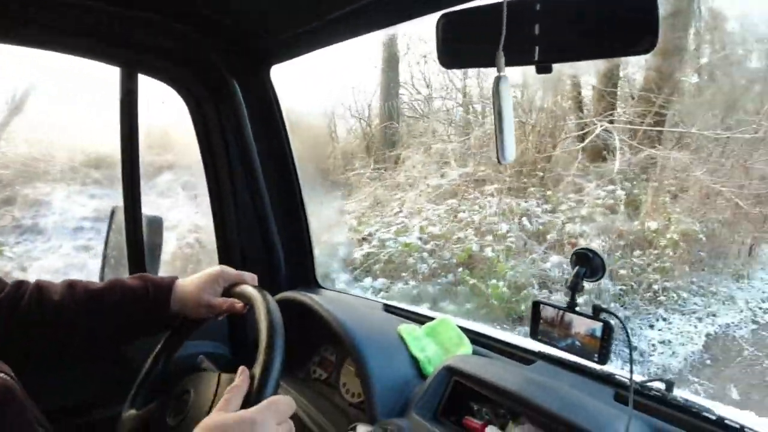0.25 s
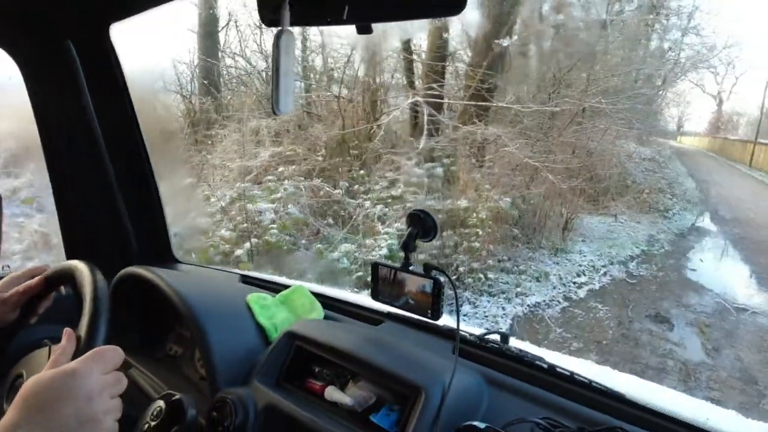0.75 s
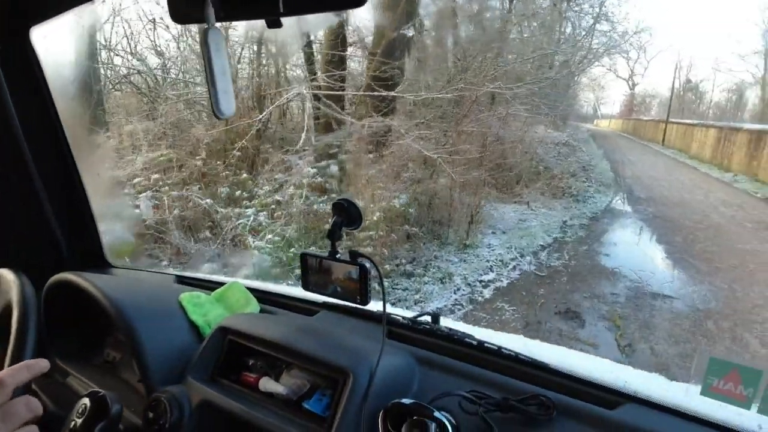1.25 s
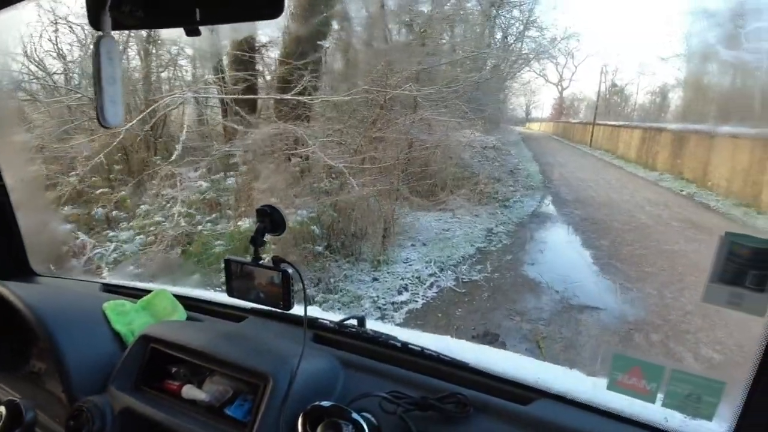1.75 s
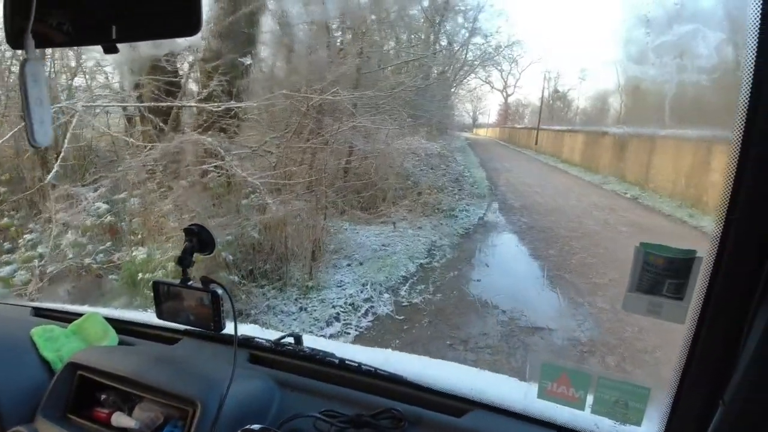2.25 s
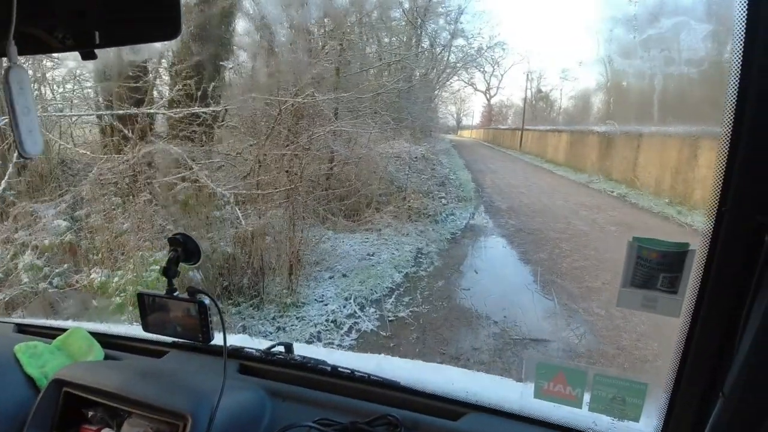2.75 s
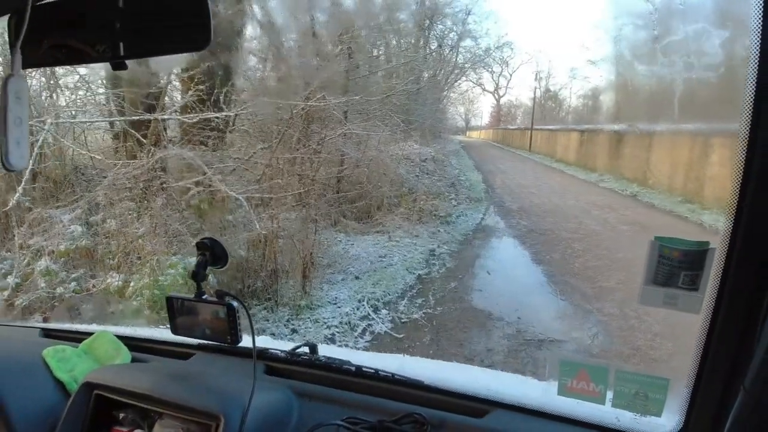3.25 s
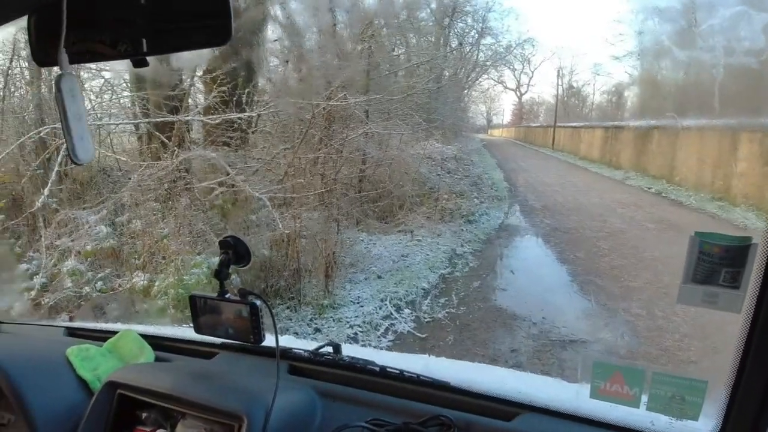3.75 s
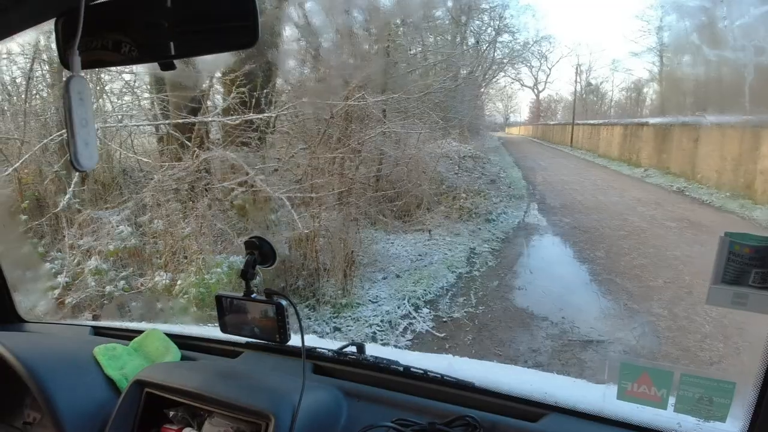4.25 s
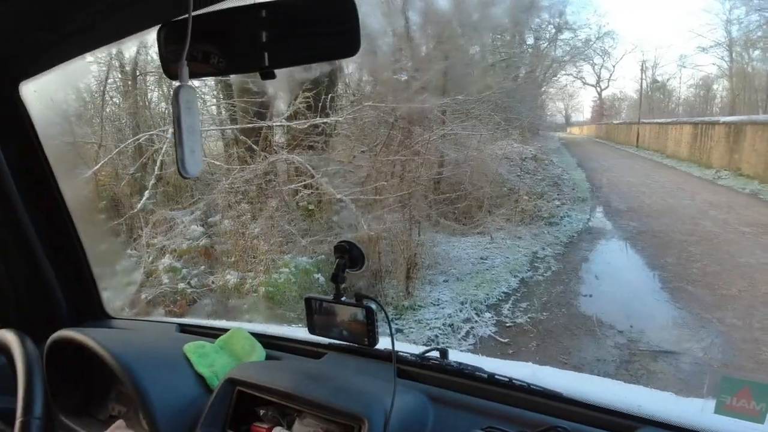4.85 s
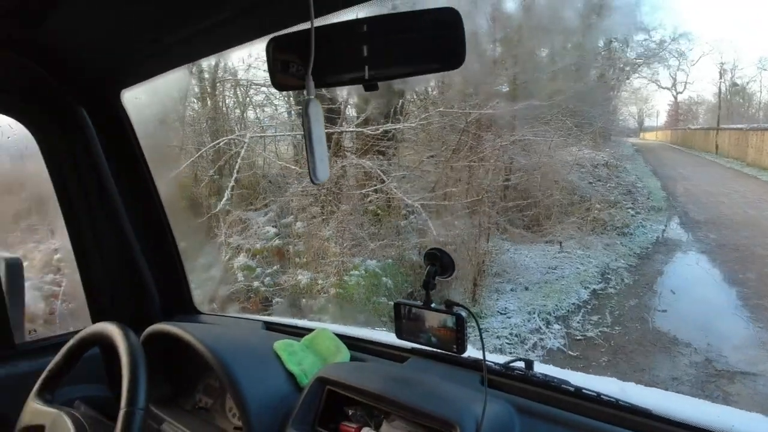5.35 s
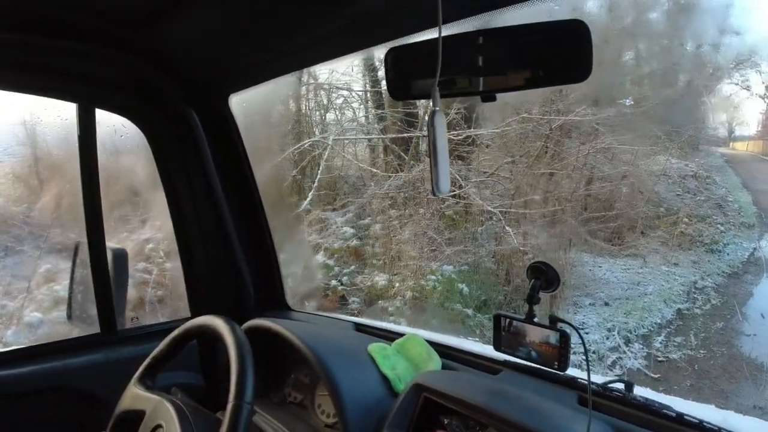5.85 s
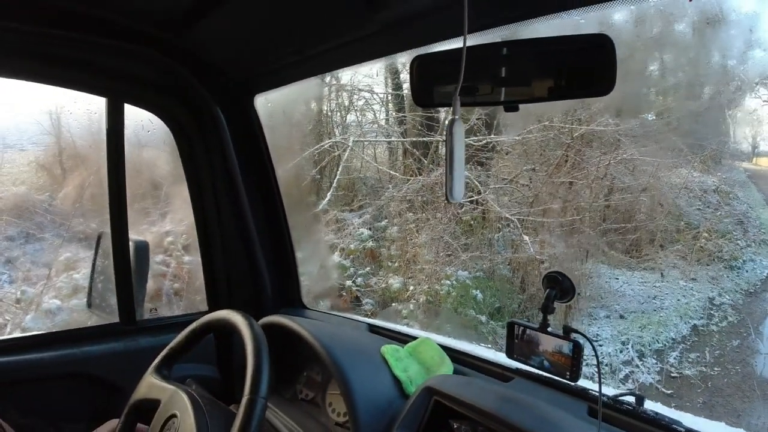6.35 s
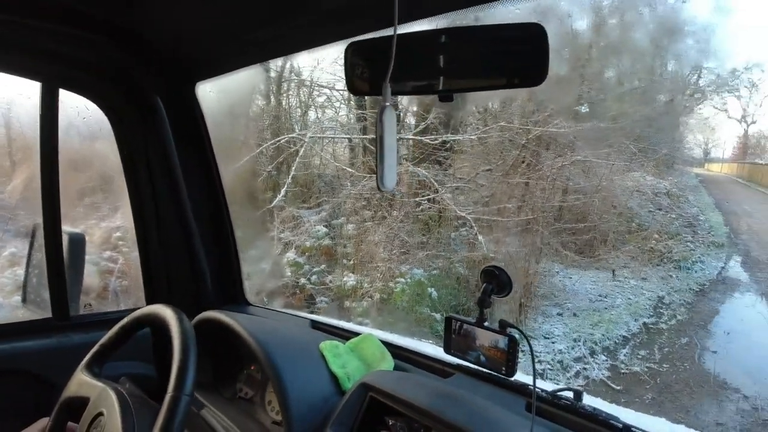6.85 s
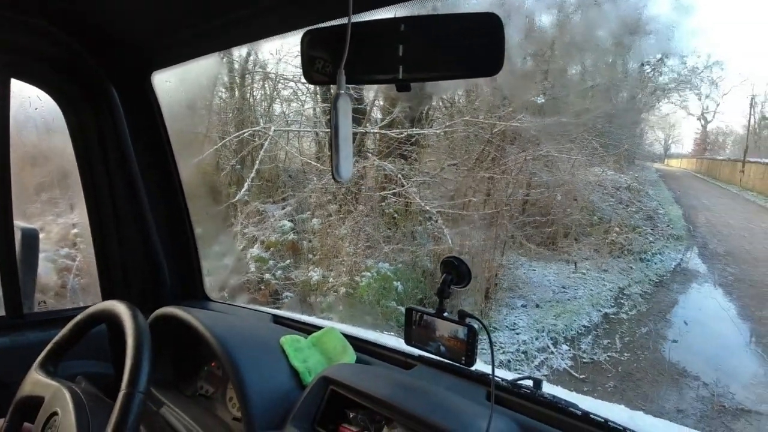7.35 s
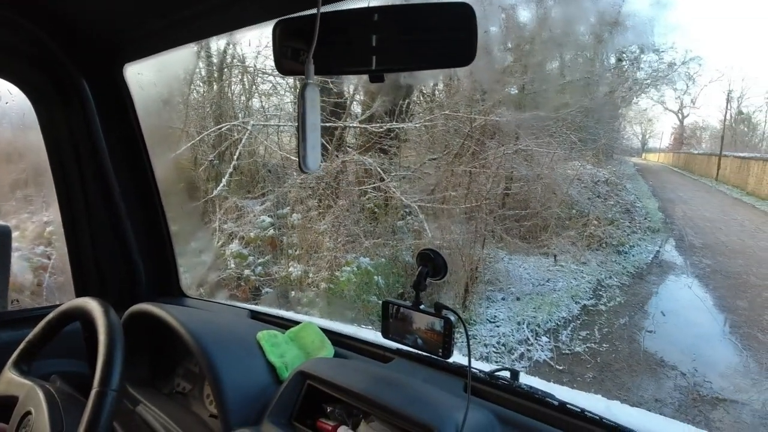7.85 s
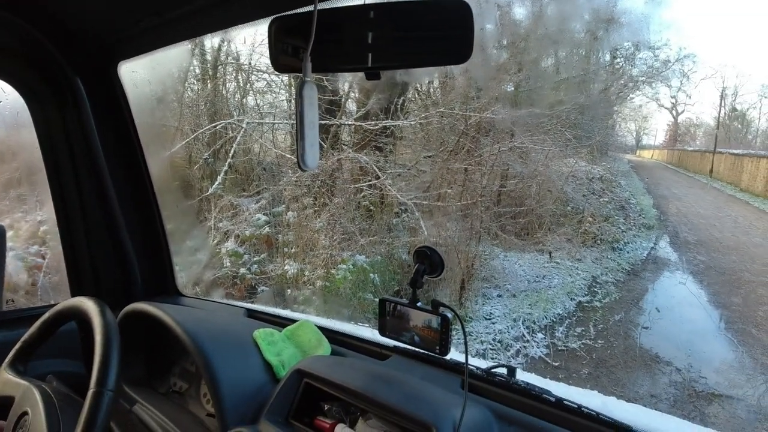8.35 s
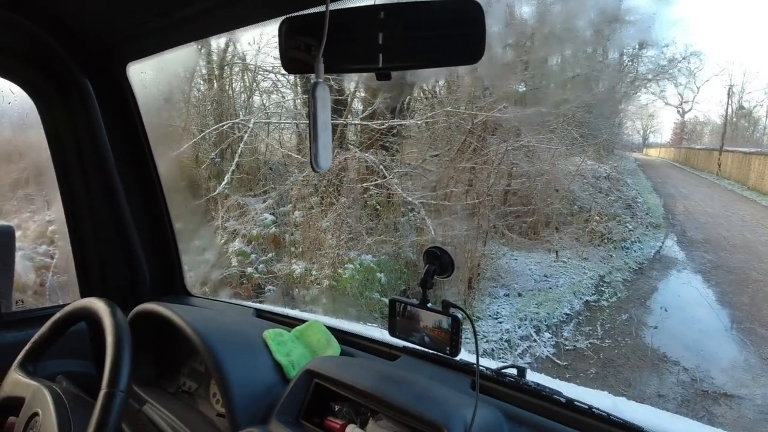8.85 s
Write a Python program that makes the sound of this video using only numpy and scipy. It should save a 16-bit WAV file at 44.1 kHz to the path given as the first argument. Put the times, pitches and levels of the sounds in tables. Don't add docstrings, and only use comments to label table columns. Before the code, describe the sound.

The sound is close and boxy, inside a small van cab, through a small microphone with muted treble. From 0 to 2 s a two-cylinder diesel rolls at about 28 uneven firings a second, a low drone with panel hum, faint whine and loose trim knocks. At 2.0 s a tinny double bang, another knock at 2.2 s, as revs fall to a slower, thumping idle by 2.5 s, with steady clatter and a wavering pump whine near 1.7 kHz. Soft cloth brushes around 3 to 4.4 s. Four loud handbrake ratchet clicks quicken from 3.95 to 4.22 s. Dull knocks at 5.05 and 5.1 s; a heavy steel lever clunk at 5.45 s booms the floor, followed by panel buzz. From 6.9 s the engine lurches and is cut; shuddering jolts, rattling trim and metallic odds continue until 8.3 s. It stops by 8.5 s; near-quiet, small ticks, then a seat slips at 9.04 s.

```python
import sys
import numpy as np
from scipy import signal
from scipy.fft import rfft, irfft
from scipy.io import wavfile
from scipy.ndimage import uniform_filter1d

SR = 44100
rng = np.random.default_rng(int(sys.argv[2]) if len(sys.argv) > 2 else 0)


def to_wav(s):
    ch = np.atleast_2d(s).T
    pcm = np.round(np.clip(ch, -1, 1) * 32767)
    wavfile.write(sys.argv[1], SR, pcm.astype(np.int16))


def decibels_to_gain(level_db):
    exponent = np.asarray(level_db, float) / 20
    return 10 ** exponent


N = 401310

# time in seconds, four-stroke cycles per second in Hz.
ENGINE_SPEED = [(0, 14.5), (.6, 14.2), (1.15, 14.15), (1.3, 13.55), (1.8, 13.5), (1.95, 13.3), (2.2, 9.4),
                (2.45, 8.26), (6.85, 8.26), (7.1, 9.1), (7.5, 8.65), (7.8, 8.4), (8.1, 7.2), (8.45, 5.5)]
ROLL_HZ, IDLE_HZ = 13.3, 8.4
FUEL_CUT_S, STALL_S = 7.05, 7.87
START_TURN = .71
ENGINE_END_S = ENGINE_SPEED[-1][0]

# frequency in Hz, level in dB.
MOUNTS = [(15, -30), (20, -18), (25, -3), (33, 0), (42, -14), (52, -14)]
# time in seconds, lift in dB, width in seconds.
MOUNT_SWELL = [
    (.82, 6, 0.12),
    (2.5, -5.5, 0.45),
    (7.05, -5, 0.12),
    (7.62, 4.5, 0.19),
]
THUMP_ROLL_DB, THUMP_IDLE_DB, STALL_DROP_DB = -60, -42, -11
# frequency in Hz, level in dB.
FLOOR_PAN = [(50, -14), (58, -7), (67, -6), (80, -15), (92, -9), (99, 1), (109, 2), (116, -9), (127, -4),
             (158, -1), (168, 0), (182, -10), (230, -9), (400, -30)]
DRONE_ROLL_DB, DRONE_IDLE_DB = -45.5, -49.5
# start in seconds, end in seconds, lift in dB.
BUZZ = [
    (2.346, 2.845, 23.5),
    (5.473, 7, 27.5),
    (7, 7.448, 16.5),
    (7.597, 8.26, 27.5),
]
BUZZ_REST_DB = -64.5

# frequency in Hz, level in dB per Hz.
CAB_COLOUR = [(35, -40), (60, -7), (189, -4), (224, -7.5), (395, -6.5), (683, -6), (1530, -19.5),
              (1670, -23), (1880, -24.5), (3600, -35.5), (4680, -62), (7920, -120)]
# frequency in Hz, width in Hz, lift in dB.
PANELS = [(114.6, 15, 5.5), (152.7, 56, 6.5), (226, 11, 7), (342, 76, 4), (585, 160, 2), (602, 28, -6),
          (813, 29, 5), (1372, 42, 3.5), (2570, 71, 0), (3326, 400, -17.5)]
# frequency in Hz, level in dB per Hz.
RUSTLE = [(3000, -10), (3500, 0), (4600, -4), (5400, -6), (6300, -2), (7500, -9), (10000, -10),
          (12500, -13), (15700, -13)]
# time in seconds, level in dB.
SHAKE = [(0, -38), (1.15, -36.5), (1.5, -36.5), (2.2, -36), (2.5, -35), (3.7, -35.5), (4.15, -32),
         (4.35, -33), (4.8, -34), (5.1, -32.5), (6.4, -31.5), (6.8, -32.5), (7.2, -38), (7.8, -38),
         (8.06, -36), (8.26, -43), (8.4, -50.5), (8.6, -62.5)]
# time in seconds, lift in dB.
SHUDDER = [(6.87, -6), (6.955, 6), (7.03, 4), (7.15, 2), (7.285, 3.5), (7.405, 7), (7.52, 5), (7.57, -3),
           (7.635, 6), (7.755, 6), (7.81, -3), (7.885, 6), (7.98, 4), (8.038, 7), (8.09, 5), (8.14, 7),
           (8.17, 4), (8.2, 4), (8.25, 6), (8.32, 5), (8.37, 1), (8.425, 3), (8.48, 2)]
SLOW_ROCK_S, QUICK_ROCK_S = .022, .016
# time in seconds, lift in dB, width in seconds.
LURCH = [(0, 8.5, 0.049), (.4, 0, .1), (.83, 3, 0.086), (1.9, 2, 0.056), (2.13, -2, 0.064), (2.94, 4, 0.07),
         (4.23, 4, 0.034), (5.08, -1, .06), (5.3, 3, 0.14), (7.17, 7.5, 0.13), (7.58, 6, 0.17),
         (8.32, 10.5, 0.097), (8.6, 14, 0.1)]
# time in seconds, lift in dB, width in seconds.
BRUSH = [(.3, 1, .2), (1.4, 2, .22), (6.2, 1.5, .37), (1.8, 2.5, .08), (3.05, 8, .09), (3.25, 3.5, .08),
         (3.46, 3.5, .07), (4.05, 4, .066), (4.425, 11, .06), (5.08, 3, .1), (6.7, 1, .14)]
# boom, panels and clatter levels in dB.
STILL_DB = [-59, -54.5, -60]
BOOM_RE_SHAKE_DB, COAST_CLATTER_RE_SHAKE_DB, CLOTH_DB = -5.5, -23, -66
CLATTER_DB, CLATTER_RISE_S, CLATTER_RISE_DB = -49, 2.88, 3.5
LUMP_ROLL, LUMP_IDLE, LUMP_COAST = .36, .04, .15
IDLE_BEAT_DEPTH, IDLE_BEAT_TURN = .2, .19

# time in seconds, pitch in Hz, level in dB.
WHINE = [(0, 1752, -55), (.6, 1752, -56), (1.2, 1751, -61), (2, 1750, -63), (3, 1737, -61),
         (3.3, 1732, -55), (3.47, 1697, -49.5), (3.72, 1683, -52), (4.05, 1676, -48), (4.3, 1663, -61),
         (4.7, 1645, -59), (5.4, 1637, -56), (5.6, 1634, -51), (6.0, 1631, -52), (6.35, 1630, -48.5),
         (6.75, 1630, -55)]
# start in seconds, end in
# seconds, pitch in Hz, level in dB.
HUM = [(0, .2, 112, -45), (0, .14, 172, -46), (.22, .49, 104, -47), (.58, .8, 167, -41.5),
       (.8, 1.15, 157, -46), (.7, 1.15, 99.5, -46.5), (1.28, 1.78, 108.5, -40.5), (1.78, 1.98, 164, -41),
       (8.33, 8.42, 2030, -76), (8.54, 8.64, 2060, -77), (8.3, 9.1, 1637, -76), (8.3, 9.1, 1250, -73),
       (8.3, 9.1, 3749, -84)]
RUMBLE_DB, HISS_DB = -67, -89

# time in seconds, peak in dB, ring in Hz.
KNOCKS = [(.458, -23, 537), (.546, -21, 824), (.546, -30, 1380), (0.64, -23, 167), (1.589, -20.5, 800),
          (1.684, -29, 587), (1.757, -26, 627), (1.83, -19.5, 555), (2.283, -21, 680), (2.291, -15.5, 680),
          (2.464, -18, 311), (2.651, -24, 696), (4.35, -20, 243), (5.468, -9.5, 1372), (5.469, -5.5, 479),
          (5.777, -25, 610), (6.066, -14.5, 226), (6.463, -17, 234), (6.556, -18, 470), (6.641, -22, 654),
          (6.701, -17, 334), (6.757, -23, 223),
          (7.028, -18, 690), (7.122, -21, 485), (7.202, -24, 496), (7.404, -19, 502), (7.519, -16, 426),
           (7.633, -19, 512), (7.693, -21.5, 477), (7.749, -20, 480), (7.941, -24, 500), (7.978, -22, 581),
           (8.028, -16.5, 490), (8.128, -13.5, 900), (8.152, -21.5, 940), (8.189, -17, 310),
           (8.26, -29, 170), (8.315, -34, 790), (8.37, -33, 700), (8.42, -31, 654), (8.478, -39, 590),
           (8.728, -32, 610), (8.888, -36.5, 474), (8.964, -39, 773)]
# time in seconds, peak in dB, ring in Hz.
TICKS = [(.544, -52, 4680), (.604, -50.5, 3600), (2.02, -51, 5960), (2.209, -51.5, 4200),
         (2.277, -53, 4160), (3.549, -48.5, 5020), (4.353, -49, 3760), (5.052, -51, 3820),
         (5.113, -51.5, 5200), (6.642, -56, 4050), (6.7, -46.5, 4870), (6.769, -47.5, 4060),
         (6.818, -47.5, 5000), (7.458, -60, 4340), (7.631, -49, 3000), (7.885, -58, 3630),
         (7.979, -54.5, 3970), (8.027, -66, 3600)]
KNOCK_T60_S = 0.078

# frequency in Hz, level in dB, time to fade by 60 dB in seconds.
TRAY = [(423, -18, .1), (746, -1.5, 0.048), (916, 2.5, 0.12), (1120, -2.5, 0.15), (1430, -13, 0.12),
        (1833, -9, 0.059)]
# time in seconds, peak in dB.
TRAY_HITS = [
    (0.546, -30),
    (2.0185, -12.5),
    (2.025, -22),
    (2.029, -16),
    (2.035, -26),
    (2.209, -26),
    (8.128, -24),
]

# frequency in Hz, level in dB, time to fade by 60 dB in seconds.
BULKHEAD = [(555, -2, 0.099), (593, 6, 0.089), (654, -8, .05)]
# time in seconds, level in dB.
BULKHEAD_LEVEL = [(.55, -60), (.7, -47), (1.2, -46), (1.35, -41), (1.9, -41), (2.0, -60)]
BULKHEAD_LAG_S = .034

# time in seconds, peak in dB.
JOLTS = [(1.683, -26), (1.757, -25), (2.651, -25.5), (5.777, -27), (6.914, -21), (6.93, -27.5),
         (6.953, -35), (6.967, -24), (7.0, -22), (7.016, -28), (7.03, -28), (7.055, -33), (7.122, -27),
         (7.202, -32), (7.266, -27), (7.356, -26.5), (7.381, -29), (7.403, -32), (7.458, -23.5),
         (7.492, -26), (7.518, -31), (7.61, -24), (7.635, -33), (7.692, -31), (7.731, -29), (7.75, -29),
         (7.826, -26), (7.872, -21.5), (7.942, -22.5), (7.978, -25), (8.006, -23.5), (8.029, -17.5),
         (8.086, -22), (8.093, -21), (8.15, -21), (8.235, -27)]
# frequency in Hz, level in dB per Hz.
JOLT_COLOUR = [(150, -13), (400, 2.5), (700, 5), (1100, -4), (1700, -14), (2500, -26), (3500, -33.5),
               (6000, -49)]
JOLT_RISE_S, JOLT_T60_S, JOLT_DB = .0006, .06, -2.5

# time in seconds, level in dB, centre in Hz, fall in dB per octave,
# scatter of the contacts in seconds.
BANGS = [(2.019, -16, 910, 15, 0.016), (2.024, -17.5, 620, 9.5, 0.024), (2.209, -21.5, 754, 14, 0.0096),
         (2.28, -25.5, 700, 5.5, 0.01), (5.051, -20.5, 125, 4.5, 0.028), (5.052, -18, 543, 7.5, 0.012),
         (5.115, -15.5, 500, 10, 0.0079), (5.441, -13.5, 1006, 9, 0.021), (5.468, -9, 544, 17, 0.012),
         (5.467, -19, 1400, 28, 0.0045), (5.463, -9, 310, 16, 0.0082), (5.48, -21, 270, 8, 0.0098),
         (5.489, -6, 318, 6, 0.026), (6.93, -18.5, 347, 20, 0.055), (6.998, -25.5, 900, 17, 0.015),
         (8.089, -20.5, 834, 12, 0.022), (8.128, -20.5, 900, 18, 0.089), (8.232, -22, 600, 8, 0.021),
         (9.033, -32, 400, 8, 0.043)]
# frequency in Hz, level in dB, share of the fading time.
DASHBOARD = [(121, 1.5, 6.7), (167, 6, 1.3), (221, 2.5, 2.2), (310, 3.5, 1.23), (468, 14, 0.29),
             (581, 6, 1.6), (700, 7.5, 0.82), (992, 2, 0.76), (1298, 8.5, 0.97), (1452, 4, 1.8),
             (1770, -6, 2), (1850, -16, 0.89), (2735, -10, .5)]
BANG_T60_S = 0.08

# time in seconds, peak in dB, steel relative to body in dB.
PAWL = [
    (3.947, -3, -15),
    (4.075, -2, -18),
    (4.1702, -2, -17.5),
    (4.219, -1, -17.5),
]
# frequency in Hz, level in dB, time to fade by 60 dB in seconds.
PAWL_BODY = [(339, -6.5, 0.056), (426, 2.5, 0.012), (500, 8.5, 0.055)]
# frequency in Hz, level in dB per Hz.
PAWL_STEEL = [(1300, -14), (1800, -5.5), (2400, 3), (3300, -1), (4200, -9), (5000, -5), (6000, -5.5),
              (7000, -17), (9000, -15), (12000, -27), (15500, -43)]
# delay in seconds, frequency in Hz,
# level in dB relative to the steel, time to fade by 60 dB in seconds.
PAWL_TIP = [(-.002, 2400, -2, 0.062), (-0.002, 2840, -2, 0.037), (-.002, 2200, -4, 0.027),
            (.001, 5900, -7.5, .04), (0.004, 3520, -5, 0.048), (.003, 1810, -7, 0.072)]
TUBE_LAG_S, TUBE_SWELL_S = 0.00954, 0.018

# frequency in Hz, level in dB, time to fade by 60 dB in seconds.
LINKAGE = [(1044, -3, 0.12), (1595, -2, 0.049), (1790, -5, 0.051), (2580, -11, 0.059), (2700, -13, 0.068),
           (3000, -10.5, 0.043), (3200, -19, 0.08), (4430, -11, 0.029), (5990, -28, 0.076),
           (6850, -24, .12), (7150, -20, .07), (8400, -26, .07)]
# time in seconds, ring in dB, rasp in dB, rasp's time to fade by 60 dB in seconds.
SLAPS = [
    (5.4393, -24, -32, .03),
    (5.4428, -22, -31, 0.052),
    (5.4636, -36, -36, .04),
    (5.469, -12, -28.5, 0.049),
    (5.477, -34, -37, 0.065),
]
# frequency in Hz, level in dB, time to fade by 60 dB in seconds.
FLOOR_BOOM = [(112, -5, 0.33), (170, 1, .25), (224.6, 1, .3), (321, -2, 0.22), (372, -3, .15)]
LEVER_S, LEVER_BOOM_DB = 5.476, -15.5

# time in seconds, peak in dB, centre in Hz.
ODDS = [(7.06, -57, 2080), (7.127, -44, 1500), (7.204, -50, 1500), (7.264, -52, 1980), (6.913, -41.5, 1390),
        (7, -42, 1480), (7.381, -44, 1560), (7.418, -52, 1460), (7.46, -42, 1690), (7.524, -49, 1630),
        (7.609, -43.5, 1590), (7.635, -38, 1350), (7.696, -43.5, 1590), (7.734, -49, 1330),
        (7.817, -44, 1500), (7.854, -44, 1360), (7.872, -40, 1410), (7.929, -45, 1590), (7.98, -38.5, 1100),
        (8.028, -33, 1310), (8.045, -44, 1980), (8.059, -44, 1290), (8.0914, -32, 1310), (8.105, -52, 2100),
        (8.165, -47, 2070), (8.14, -41, 1330), (8.229, -45, 1930), (8.357, -59, 1550), (8.445, -65, 1630),
        (8.51, -54, 1480)]
ODDS_T60_S = 0.071
# time in seconds, peak in dB.
CLIP = [(7.34, -49), (7.457, -42.5), (7.574, -43.5), (7.69, -59), (7.821, -45), (7.871, -42), (8.15, -41),
        (8.286, -49)]
CLIP_HZ, CLIP_T60_S = 2450, 0.2
# frequency in Hz, level in dB, time to fade by 60 dB in seconds.
SEAT = [(198, 3, 0.05), (447, 2, 0.024), (680, -24, 0.048), (900, -8, 0.043)]
SEAT_S, SEAT_STEP_S, SEAT_DB, SEAT_FADE_DB = 9.0365, 0.0155, -23, -1


def curve(table):
    s, *columns = np.transpose(table)
    return [np.interp(np.arange(N) / SR, s, c) for c in columns]


def shape(points, hz):
    f, db = np.transpose(points)
    return np.interp(np.log(np.maximum(hz, 1)), np.log(f), db)


def unit(x):
    return x / np.sqrt(np.mean(x ** 2))


def walk(rate, slew):
    k = int(SR / rate)
    held = np.repeat(rng.standard_normal(N // k + 1), k)[:N]
    return uniform_filter1d(held, max(int(k * slew), 1))


def band(x, points):
    hz = np.arange(N // 2 + 1) * SR / N
    inside = (hz > points[0][0]) * (hz < points[-1][0])
    return irfft(rfft(x) * decibels_to_gain(shape(points, hz)) * inside, N)


def steady(x, db):
    return x / np.sqrt(uniform_filter1d(x ** 2, size=SR // 3) + 1e-12) * decibels_to_gain(db)


def step(s, width):
    return np.clip((np.arange(N) / SR - s) / width + .5, 0, 1)


def swells(rows):
    t = np.arange(N) / SR
    return sum(db * np.exp(-.5 * ((t - s) / width) ** 2) for s, db, width in rows)


def ring(modes, push, length_s=.3):
    t = np.arange(int(length_s * SR)) / SR
    tail = sum(decibels_to_gain(db) * np.exp(-np.log(1000) * t / t60) * np.sin(2 * np.pi * hz * t)
               for hz, db, t60 in modes)
    return signal.fftconvolve(tail, push)


def burst(colour_db, rise_s, t60, length_s=0.38):
    t = np.arange(int(length_s * SR)) / SR
    swell = (1 - np.exp(-t / rise_s)) ** 2
    noise = rng.standard_normal(len(t)) * swell * np.exp(-np.log(1000) * t / t60)
    hz = np.arange(len(t) // 2 + 1) / length_s + 1
    return irfft(rfft(noise) * decibels_to_gain(colour_db(hz)), len(t))


def add(out, s, sound, peak_db):
    i = int(s * SR)
    sound = sound[:N - i]
    out[i:i + len(sound)] += sound * decibels_to_gain(peak_db) / np.max(np.abs(sound))


def idling():
    return np.clip((ROLL_HZ - curve(ENGINE_SPEED)[0]) / (ROLL_HZ - IDLE_HZ), 0, 1)


def engine_turns():
    return np.cumsum(curve(ENGINE_SPEED)[0]) / SR


def firings():
    turns = START_TURN + engine_turns()
    pulses = np.zeros(N)
    for lag, db in ((0, 0), (.25, -1.5)):
        at = np.flatnonzero(np.diff(np.floor(turns - lag)) > 0)
        pulses[at] = decibels_to_gain(db + .7 * rng.standard_normal(200)[:len(at)])
    return pulses


def mount_thump(pulses):
    level_db = THUMP_ROLL_DB + (THUMP_IDLE_DB - THUMP_ROLL_DB) * idling()
    level_db = level_db + swells(MOUNT_SWELL) + STALL_DROP_DB * step(STALL_S, 0.24)
    low = steady(band(pulses, MOUNTS), level_db)
    upper = steady(band(pulses, [(43, 0.01), (57, 0.0)]), level_db - 21.0)
    return low + upper


def floor_drone(pulses):
    slow_idling = uniform_filter1d(idling(), size=SR // 2)
    drone_db = DRONE_ROLL_DB + (DRONE_IDLE_DB - DRONE_ROLL_DB) * slow_idling
    return steady(band(pulses, FLOOR_PAN), drone_db)


def panel_buzz(pulses):
    level_db = BUZZ_REST_DB + sum(db * (step(a, 0.25) - step(b, 0.32)) for a, b, db in BUZZ)
    sway_db = 2.2 * np.sin(2 * np.pi * engine_turns() + 1.0)
    kicks = pulses + 0.07 * rng.standard_normal(N)
    buzz = ring([(226, 4.5, 0.24), (245.0, -11.0, 0.13)], kicks, .5)[:N]
    return steady(buzz, level_db + sway_db)


def firing_gate(pulses):
    t = np.arange(SR // 6) / SR
    gate = signal.fftconvolve(pulses, (t / .012) ** 2 * np.exp(-t / 0.0096))[:N]
    gate = gate / (uniform_filter1d(gate, size=SR // 3) + 1e-6)
    lump = LUMP_ROLL + (LUMP_IDLE - LUMP_ROLL) * idling()
    lump = lump + (LUMP_COAST - LUMP_IDLE) * step(FUEL_CUT_S, 0.12)
    gate = 1 + lump * (1 - step(ENGINE_END_S, 0.35)) * (gate - 1)
    beat = np.cos(4 * np.pi * (START_TURN + engine_turns() - IDLE_BEAT_TURN))
    return gate * (1 + IDLE_BEAT_DEPTH * idling() * (1 - step(FUEL_CUT_S, 0.68)) * beat)


def cab_gains():
    shake_db, cut = curve(SHAKE)[0], step(FUEL_CUT_S, 0.52)
    burn_db = CLATTER_DB + CLATTER_RISE_DB * step(CLATTER_RISE_S, 0.27)
    clatter_db = (1 - cut) * burn_db + cut * (shake_db + COAST_CLATTER_RE_SHAKE_DB)
    boom_db = shake_db + BOOM_RE_SHAKE_DB + swells(LURCH)
    engine = [boom_db, shake_db, clatter_db]
    gains = [np.hypot(decibels_to_gain(db), decibels_to_gain(still)) for db, still in zip(engine, STILL_DB)]
    cloth_db = CLOTH_DB + swells(BRUSH) * (0.67 + .2 * walk(37, 0.44))
    return gains + [decibels_to_gain(cloth_db)]


def cab_noise(pulses):
    hz = np.arange(N // 2 + 1) * SR / N
    db = shape(CAB_COLOUR, hz)
    db = db + sum(lift / (1 + (2 * (hz - f) / width) ** 2) for f, width, lift in PANELS)
    white = rfft(rng.standard_normal(N))
    gate = firing_gate(pulses)
    rocks = [(s, lift, SLOW_ROCK_S if s < STALL_S + .05 else QUICK_ROCK_S) for s, lift in SHUDDER]
    rock = decibels_to_gain(swells(rocks))
    zones = np.zeros((4, N))
    jolt = walk(10, 0.84)
    for centre in 63 * 2 ** (np.arange(18) / 3):
        octaves = np.log2(np.maximum(hz, 1) / centre)
        window = np.cos(np.pi / 2 * np.clip(3 * octaves, -1, 1)) ** 2
        flicker_db = .55 * jolt + 1.2 * walk(14, .8)
        motion = gate ** .55 * rock ** 1.25 if centre > 900 else gate * rock
        zone = np.searchsorted([300, 1200], centre)
        zones[zone] += irfft(white * decibels_to_gain(db) * window, N) * decibels_to_gain(flicker_db) * motion
    rustle = irfft(white * decibels_to_gain(shape(RUSTLE, hz)) * (hz > 3000), N)
    zones[3] = rustle * decibels_to_gain(1.2 * jolt) * gate ** .4 * rock ** .15
    return sum(unit(z) * gain for z, gain in zip(zones, cab_gains()))


def whine():
    hz, db = curve(WHINE)
    on = np.clip((WHINE[-1][0] - np.arange(N) / SR) / .05, 0, 1)
    level = np.sqrt(2) * on * decibels_to_gain(db - .5 + 2 * walk(25, .9))
    return level * np.sin(2 * np.pi * np.cumsum(hz + 4.5 * walk(18, .9)) / SR)


def hum():
    out = np.zeros(N)
    for a, b, hz, db in HUM:
        level = np.sqrt(2) * decibels_to_gain(db + 1.1 * walk(12, .9)) * (step(a, .1) - step(b, .1))
        pitch = hz * (1 + .008 * min(200 / hz, 1) * walk(6, .9))
        out += level * np.sin(2 * np.pi * np.cumsum(pitch) / SR)
    return out


def rumble():
    return unit(band(rng.standard_normal(N), [(12, -4.5), (30, 7.0), (70, 4.0)])) * decibels_to_gain(RUMBLE_DB)


def knocks():
    out = np.zeros(N)
    t60 = KNOCK_T60_S
    for s, db, hz in KNOCKS:
        contact = (1 + .6 * rng.standard_normal(300)) * np.exp(-np.arange(300) / 4)
        push = np.convolve(contact, np.hanning(24))
        modes = [(hz, 0, t60), (1.41 * hz, -5, 0.37 * t60), (2.5 * hz, -17, 0.26 * t60)]
        add(out, s - .002, ring(modes, push), db - 3.5)
    return out


def ticks():
    out = np.zeros(N)
    for s, db, hz in TICKS:
        def colour(f):
            return -np.where(f > hz, 20, 5) * np.abs(np.log2(f / hz)) - 30 * (f < 500)
        add(out, s - .001, burst(colour, 0.00094, 0.052), db + 6.0)
    return out


def tin_tray():
    out = np.zeros(N)
    for s, db in TRAY_HITS:
        add(out, s, ring(TRAY, np.hanning(26)), db)
    return out


def bulkhead(pulses):
    push = np.r_[np.zeros(int(BULKHEAD_LAG_S * SR)), np.hanning(60)]
    rung = signal.fftconvolve(pulses, ring(BULKHEAD, push))[:N]
    return steady(rung, curve(BULKHEAD_LEVEL)[0]) * (1 - step(BULKHEAD_LEVEL[-1][0], .05))


def jolts():
    out = np.zeros(N)
    for s, db in JOLTS:
        knock = burst(lambda hz: shape(JOLT_COLOUR, hz), JOLT_RISE_S, JOLT_T60_S)
        add(out, s - .001, knock, db + JOLT_DB)
    return out


def bangs():
    out = np.zeros(N)
    for s, db, centre_hz, fall_db, scatter in BANGS:
        def colour(hz):
            fall = fall_db * np.abs(np.log2(hz / centre_hz)) ** 1.3
            return -fall - 12 * np.maximum(np.log2(hz / min(4500, 5 * centre_hz)), 0)
        size, chance = rng.standard_normal((2, 4000))
        n = int(np.clip(scatter * SR, 50, 4000))
        push = (size * (np.abs(chance) > 2.2))[:n] * np.linspace(1, .3, n)
        push[0] = 3
        modes = [(hz, level + colour(hz), BANG_T60_S * share) for hz, level, share in DASHBOARD]
        add(out, s, ring(modes, np.convolve(push, np.hanning(34))), db - 1.5)
        add(out, s - .002, burst(colour, scatter / 3, BANG_T60_S + scatter), db - 8)
    return out


def handbrake():
    out = np.zeros(N)
    for s, db, steel_db in PAWL:
        t = np.arange(int(0.013 * SR)) / SR
        thud = np.hanning(len(t)) * t ** 0.35 * np.sin(2 * np.pi * 390 * t)
        add(out, s - .002, ring(PAWL_BODY, thud), db - 5.0)
        t = np.arange(int(TUBE_SWELL_S * SR)) / SR
        swell = np.hanning(len(t)) * np.sin(2 * np.pi * 560 * t)
        add(out, s + TUBE_LAG_S, ring([(581, 0, 0.035), (500, -6, .03)], swell), db - 12.5)
        rasp = burst(lambda hz: shape(PAWL_STEEL, hz), 0.0032, 0.066)
        add(out, s + 0.00049, rasp, db + steel_db - 0.5)
        for lag, hz, tip_db, t60 in PAWL_TIP:
            scrape = rng.standard_normal(130) * np.hanning(130)
            add(out, s + lag, ring([(hz, 0, t60)], scrape), db + steel_db - 8.5 + tip_db)
    add(out, PAWL[-1][0] + 0.0214, ring([(167, -1.0, 0.2), (112, -16, 0.95)], np.hanning(200)), -21)
    return out


def linkage():
    def colour(hz):
        above = 26 * np.maximum(np.log2(hz / 8500), 0)
        return -4.0 * np.log2(hz / 3000) - 30 * (hz < 2000) - above
    out = np.zeros(N)
    for s, ring_db, rasp_db, t60 in SLAPS:
        add(out, s, ring(LINKAGE, np.hanning(6)), ring_db)
        add(out, s - .001, burst(colour, 0.00067, t60), rasp_db)
    return out


def floor_boom():
    out = np.zeros(N)
    add(out, LEVER_S, ring(FLOOR_BOOM, np.hanning(90)), LEVER_BOOM_DB)
    return out


def glovebox_odds():
    out = np.zeros(N)
    for s, db, hz in ODDS:
        def colour(f):
            return -np.where(f > hz, 14, 30) * np.abs(np.log2(f / hz))
        add(out, s - .001, burst(colour, 0.0023, ODDS_T60_S), db)
    return out


def clip():
    def colour(f):
        return -np.where(f > CLIP_HZ, 90, 18) * np.abs(np.log2(f / CLIP_HZ))
    out = np.zeros(N)
    for s, db in CLIP:
        add(out, s, burst(colour, 0.0015, CLIP_T60_S), db)
    return out


def seat():
    out = np.zeros(N)
    for k in range(4):
        add(out, SEAT_S + k * SEAT_STEP_S, ring(SEAT, np.hanning(40)), SEAT_DB + SEAT_FADE_DB * k ** 2.0)
    return out


def scene():
    running = np.clip((ENGINE_END_S - np.arange(N) / SR) / 0.041, 0, 1)
    pulses = firings()
    engine = running * (mount_thump(pulses) + floor_drone(pulses) + panel_buzz(pulses))
    engine = engine + cab_noise(pulses) + whine() + hum() + rumble() + bulkhead(pulses)
    no_bass = signal.butter(3, 95, "high", fs=SR, output="sos")
    hits = signal.sosfilt(no_bass, knocks() + ticks() + bangs() + handbrake() + seat())
    loose = tin_tray() + jolts() + linkage() + floor_boom() + glovebox_odds() + clip()
    return (engine + hits + loose)[None]


def fleck_treble(x, low_hz=3300):
    hz, t, z = signal.stft(x, SR, window="cosine", nperseg=1536, noverlap=768)
    top_db = np.interp(t, [2.8, 3.6, 7], [12, 2, 0])
    a = int(low_hz / hz[1])
    while a < len(hz):
        b = a + min(int(a / 9), 22)
        db = 10 * np.log10(np.mean(np.abs(z[a:b]) ** 2, axis=0) + 1e-20)
        luck = np.convolve(rng.standard_normal(len(db)), [.92, .38], "same")
        bar_db = -.5 + 2.8 * np.log2(hz[a] / low_hz) + top_db * (hz[a] > 12700)
        z[a:b] *= np.where(db - np.median(db) + 5 * luck > bar_db, 1, decibels_to_gain(-28))
        a = b
    z[hz > 15750] = 0
    return signal.istft(z, SR, window="cosine", nperseg=1536, noverlap=768)[1][:N]


def band_limit(x):
    return signal.sosfilt(signal.butter(12, 15710, fs=SR, output="sos"), x)


def record(dry):
    hiss = unit(band(rng.standard_normal(N), [(2000, 0), (8000, -3), (15700, -6)])) * decibels_to_gain(HISS_DB)
    mix = (fleck_treble(dry[0]) + hiss)[None]
    return band_limit(mix)


dry = scene()
out = record(dry)
to_wav(out)
```